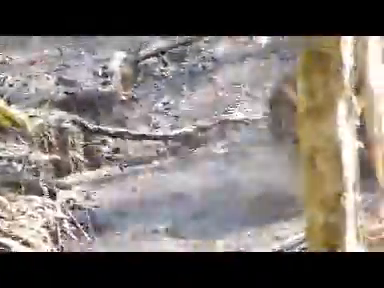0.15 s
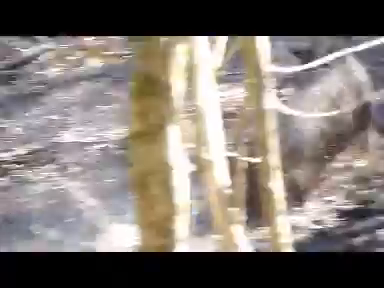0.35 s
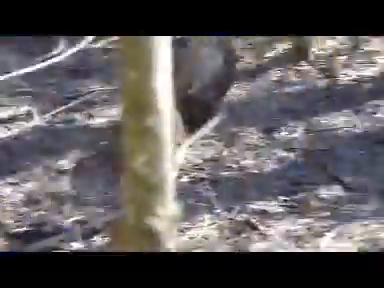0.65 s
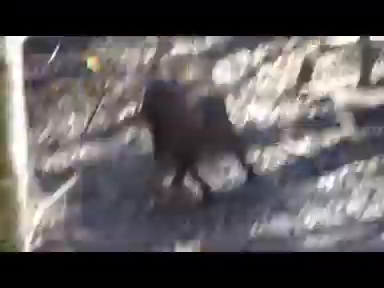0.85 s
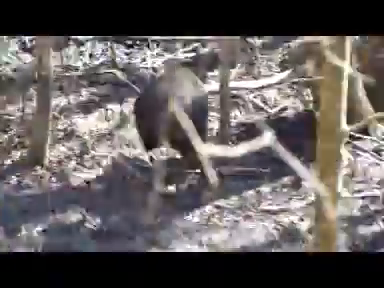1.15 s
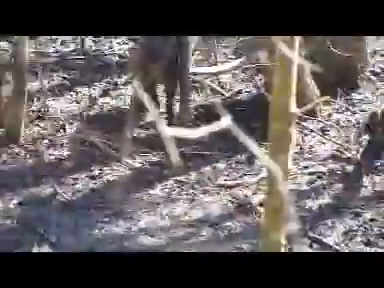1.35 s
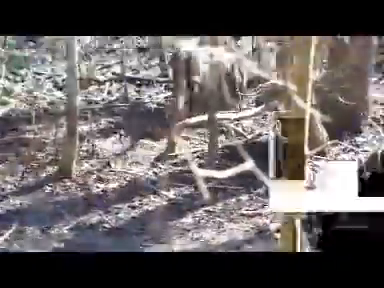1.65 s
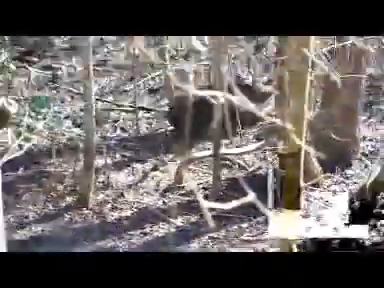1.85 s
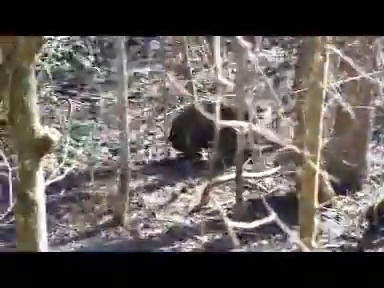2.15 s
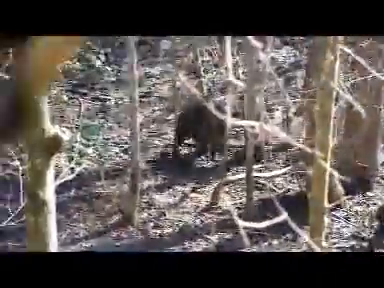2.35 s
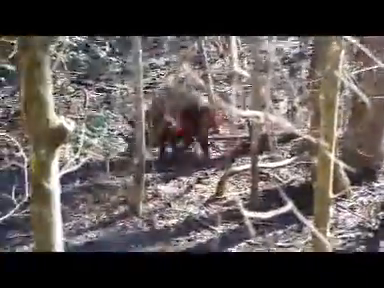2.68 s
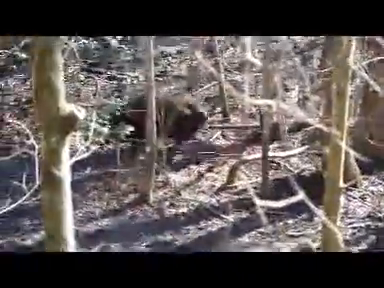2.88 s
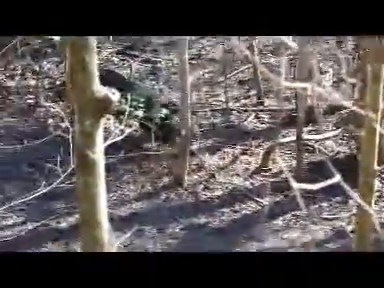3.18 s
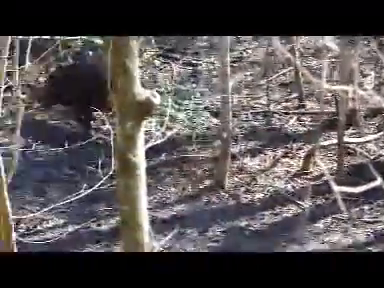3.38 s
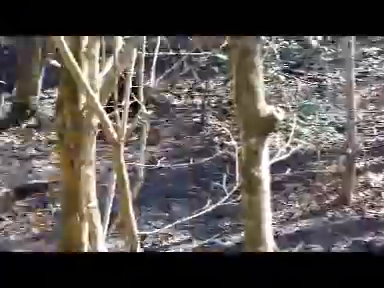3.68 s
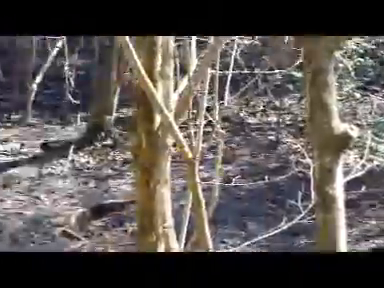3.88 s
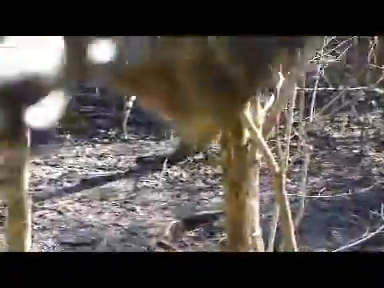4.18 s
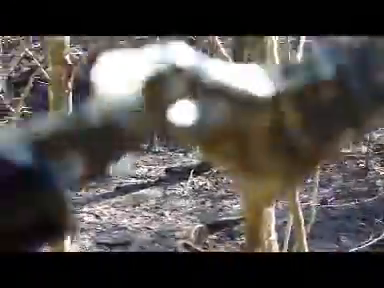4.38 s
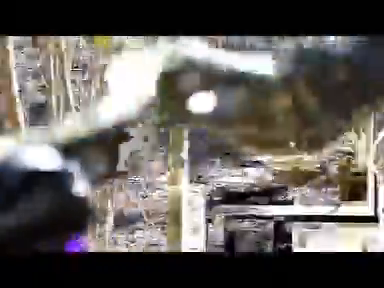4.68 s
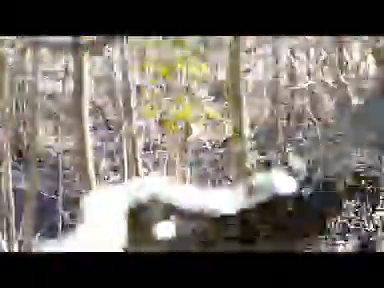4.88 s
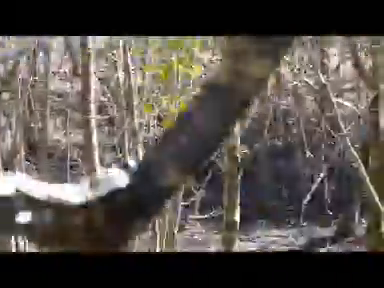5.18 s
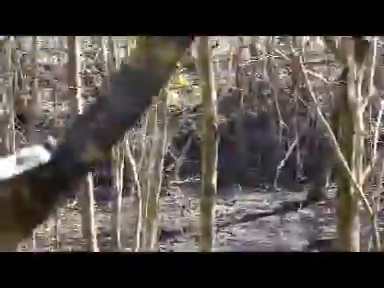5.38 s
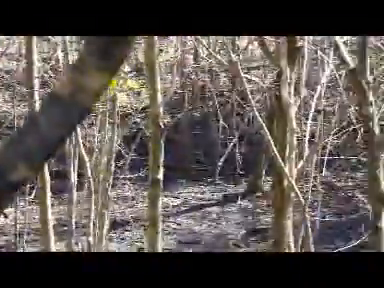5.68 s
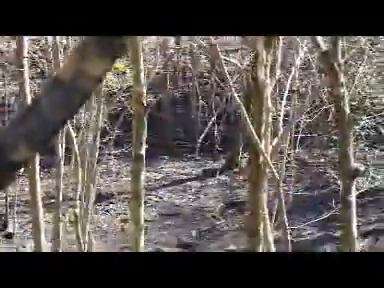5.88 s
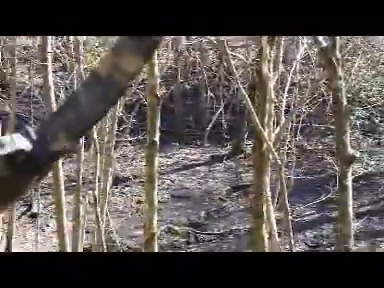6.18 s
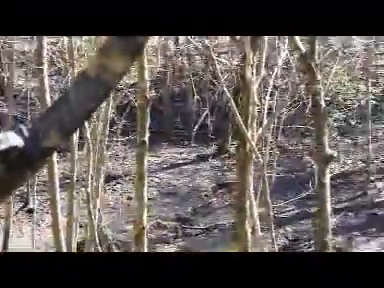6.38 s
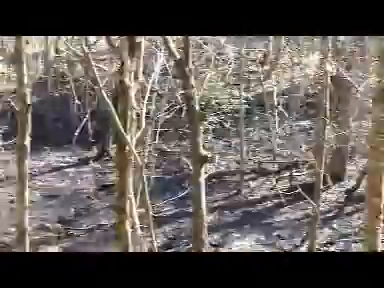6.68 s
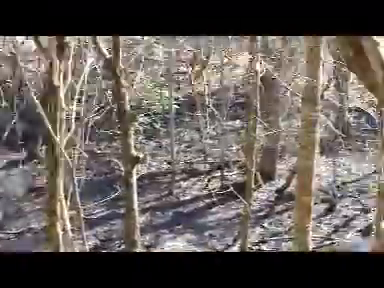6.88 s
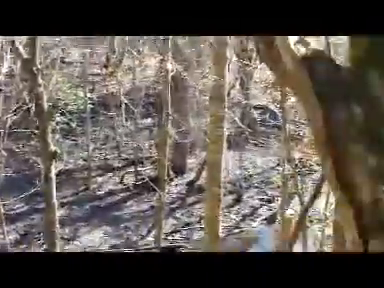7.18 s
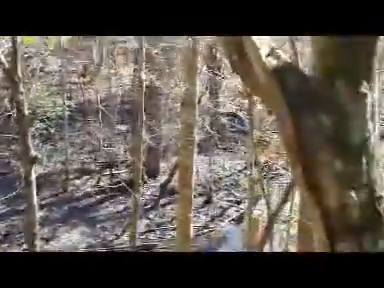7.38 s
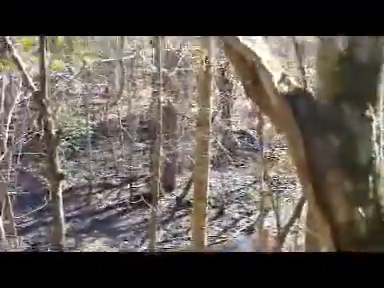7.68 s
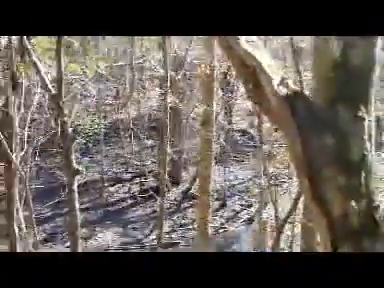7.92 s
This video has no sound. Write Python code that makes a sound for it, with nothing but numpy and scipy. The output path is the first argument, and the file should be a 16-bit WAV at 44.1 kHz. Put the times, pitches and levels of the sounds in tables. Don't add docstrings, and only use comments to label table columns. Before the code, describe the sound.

Outdoors in a dry wood, a hog cries hoarsely, grunts, falls nearly quiet, then lets out a long strained scream with cracking, gliding tones. Hooves crackle through leaf litter and break twigs while it mutters short throaty grunts. Two more clusters of torn squeals finish it. Sound is band-limited, bass-light and slightly gritty, with faint air noise and a brief diffuse woodland tail.

```python
import sys
import numpy as np
from scipy import signal
from scipy.fft import rfft, irfft, next_fast_len
from scipy.io import wavfile
from scipy.ndimage import uniform_filter1d

SR = 44100
rng = np.random.default_rng(int(sys.argv[2]) if len(sys.argv) > 2 else 0)


def dump_mix(stems):
    frames = np.atleast_2d(stems).T
    limited = np.clip(frames, -1, 1)
    pcm = np.round(limited * 32767).astype(np.int16)
    wavfile.write(sys.argv[1], SR, pcm)


def magnitude_from_level(level_db):
    exponent = np.asarray(level_db, float) / 20
    return 10 ** exponent


N = 355005

# (start [s], hold [s], chest [dB], throat over chest [dB])
GRUNTS = [(0, 0.0069, -20.5, -4), (0.059, 0.13, -31, -2), (0.299, 0.043, -32, -0.5), (0.366, 0.061, -26, 0),
          (0.568, 0.12, -31, 3), (0.694, 0.052, -27, 1), (0.862, 0.05, -37, 3), (1.009, 0.025, -49, 8),
          (1.216, 0.063, -41, 0), (1.772, 0.038, -40, -13), (2.489, 0.041, -30, -3),
          (3.038, 0.13, -31.5, 1.5), (3.404, 0.11, -35.5, 2.5), (3.559, 0.048, -36, 5),
          (3.743, 0.0066, -35, 8), (3.763, 0.008, -35, 10), (3.785, 0.018, -33, 10),
          (3.819, 0.029, -45.5, 8), (3.866, 0.052, -28, -1.5), (3.938, 0.027, -35.5, 0.5),
          (4.103, 0.046, -36, 4), (4.194, 0.046, -32, 0), (4.439, 0.082, -37, 4),
          (4.56, 0.029, -31.5, -0.5), (4.783, 0.03, -36.5, 5), (4.836, 0.021, -36, 5),
          (4.87, 0.027, -31, 8.5), (4.925, 0.022, -31.5, 3.5), (5.126, 0.086, -35, 2.5),
          (5.235, 0.024, -38, -1.5), (5.462, 0.099, -40.5, 5), (5.755, 0.046, -39, 7),
          (5.83, 0.075, -28.5, -4.5), (6.187, 0.054, -30, -4), (6.261, 0.036, -21.5, -10),
          (6.34, 0.098, -34.5, -2), (6.911, .1, -32.5, -6.5), (7.223, 0.16, -31.5, 12),
          (7.632, 0.02, -34, 2), (7.655, 0.061, -33, 8.5), (7.748, 0.15, -32, 8)]
# (start [s], hold [s], chest [dB], throat over chest [dB])
GROANS = [(1.997, .04, -34.5, -2), (2.045, 0.062, -30, -0.5), (2.106, 0.17, -35, 2.5),
          (2.588, 0.18, -38, -5.5), (2.782, .11, -31.5, -0.5), (6.645, .04, -38, 9), (6.695, 0.06, -32, 5),
          (6.799, .11, -29, -1.5), (7.002, .1, -41, 8.5), (7.413, .1, -44.5, 10.5), (7.918, .15, -34, -2)]
# (start [s], hold [s], squeal [dB], overtone over squeal [dB])
SQUEALS = [(0, 0.051, -17.5, -13), (0.051, 0.026, -24, 0), (0.078, 0.061, -24, 11.5),
           (.15, 0.043, -26, 5.5), (0.32, 0.049, -31, 11), (0.381, .03, -23, 12), (0.41, 0.037, -20, 1.5),
           (.57, 0.093, -24, 1.5), (.695, 0.048, -20, 9), (0.888, 0.061, -32, -1), (1.227, 0.037, -29, -5),
           (1.305, 0.028, -33, 11.5), (1.794, 0.071, -37.5, 7), (2.016, 0.025, -36, 1),
           (2.05, 0.032, -25, 9), (2.07, 0.098, -19.5, 6), (2.175, 0.11, -16.5, 3.5),
           (2.28, 0.054, -14, -4), (2.343, 0.019, -15, -2), (2.38, 0.073, -25.5, 6), (2.514, .01, -20, 2.5),
           (2.547, 0.17, -18, 4.5), (2.715, 0.049, -21, -2), (2.776, 0.095, -19.5, 9.5),
           (2.917, 0.18, -30, 4.5), (3.408, 0.0052, -28, 0.5), (3.786, 0.021, -27.5, -9),
           (4.188, 0.032, -30, -11), (4.461, 0.035, -28, -3), (4.874, 0.025, -21, -2),
           (6.38, 0.079, -23.5, 5), (6.651, 0.038, -33, 5.5), (6.705, 0.05, -14.5, 1),
           (6.764, 0.14, -15.5, 4), (6.902, .1, -19, 8.5), (7.003, 0.082, -21, 6), (7.092, .07, -27, 6),
           (7.241, 0.049, -26.5, 5), (7.295, 0.084, -18, 5), (7.659, 0.035, -28.5, 5.5),
           (7.812, 0.073, -29, 9.5), (7.888, 0.082, -23, 8.5), (7.998, 0.037, -21.5, 7)]
# (start [s], hold [s], lower band level [dB], tearing [0-1], lower band frequency [Hz])
TEARS = [(0.036, 0.109, -27, 0.5, 1375), (0.374, 0.082, -30, 0.44, 1438), (0.603, 0.156, -27.5, 0.37, 1397),
         (1.302, 0.0693, -57, 0.95, 1368), (2.057, .12, -29.5, 0.05, 1548), (2.189, .165, -21, 0.01, 1701),
         (2.513, 0.012, -21.5, 0.34, 1377), (2.546, 0.201, -27, 0.03, 1384), (2.768, 0.10056, -27, 1, 1402),
         (2.921, 0.16, -43, 0.37, 1369), (4.87, 0.03, -22, 0.9, 1408), (6.694, 0.0588, -29.5, 0.43, 1394),
         (6.801, 0.26, -32.5, 0.36, 1526), (7.248, .14, -27.5, 0.59, 1371),
         (7.659, 0.26, -36.5, 0.66, 1366), (7.911, 0.22, -26, 0.8, 1316)]
# (start [s], hold [s])
RATTLES = [
    (0, .2),
    (2.0, .03),
    (2.51, .05),
    (7.21, .04),
    (7.65, .17),
]
# (time [s], frequency [Hz])
JAW = [(0, 493), (.24, 358), (1.23, 334), (1.99, 450), (2.71, 437), (2.9, 357), (3.03, 263), (3.59, 377),
       (3.74, 295), (3.88, 523), (4.64, 442), (5.0, 548), (5.76, 423), (6.37, 473), (6.72, 394), (6.9, 445),
       (7.0, 479), (8.05, 404)]
# (time [s], squeal frequency [Hz], overtone frequency [Hz])
MOUTH = [(0, 1880, 2940), (.07, 1492, 3143), (.14, 1566, 3480), (.26, 1714, 3195), (.4, 1907, 3200),
         (.55, 1492, 3200), (.68, 1512, 3160), (.75, 1698, 3200), (1.0, 1468, 3132), (2.05, 1853, 3210),
         (2.14, 1850, 3296), (2.27, 1950, 3613), (2.33, 1976, 3416), (2.49, 1942, 3353), (2.52, 1950, 4211),
         (2.59, 1808, 3400), (2.76, 1619, 3400), (2.86, 2182, 3213), (3.06, 1414, 3290), (6.3, 1512, 3208),
         (6.7, 1950, 2843), (6.8, 1896, 3290), (7.0, 1982, 3242), (7.2, 2032, 3086), (7.32, 1962, 2900),
         (7.67, 2163, 2647), (7.86, 2076, 2646), (8.05, 2060, 2940)]
# (frequency [Hz], width [Hz], level [dB])
SNOUT = [(1323, 200, -7), (2094, 620, -6)]
# (frequency [Hz], width [Hz], level [dB])
RASP = [(1252, 130, -6.5), (1950, 200, 1), (2320, 960, 2.5), (2800, 210, -2.5), (3400, 870, 2.5),
        (4084, 690, 0), (4710, 500, -8)]
# (start [s], length [s], rms level [dB], from [Hz], to [Hz])
WHINES = [(0.0, .036, -25.5, 516, 420), (.41, .045, -28, 1430, 1480), (.705, .03, -27, 2250, 2150),
          (1.226, .04, -32, 1400, 1800), (2.045, .1, -33, 1030, 1080), (2.09, .074, -23, 1900, 1880),
          (2.25, .11, -19, 2050, 1930), (2.336, .034, -29, 3550, 3400), (2.345, .017, -22, 1930, 2300),
          (2.56, .039, -28, 1412, 1287), (2.6, .07, -26, 1420, 1280), (2.66, .11, -21, 1680, 1270),
          (2.688, .087, -28, 1300, 1282), (2.758, .044, -28.5, 1290, 1192), (2.892, .05, -33, 2600, 1900),
          (2.92, .08, -37, 2950, 2600), (2.999, .078, -38, 2400, 2188), (2.99, .15, -36, 228, 326),
          (3.77, .055, -34, 799, 770), (4.785, .057, -34, 820, 803), (5.765, .05, -36, 800, 820),
          (6.377, .093, -31, 1573, 1770), (6.698, .076, -32, 4780, 4900), (6.7, .17, -34, 390, 420),
          (6.73, .1, -33, 1000, 1020), (6.8, .07, -26, 3300, 3450), (6.801, .052, -26.5, 2000, 1900),
          (6.88, .08, -32.5, 408, 440), (6.9, .12, -35, 570, 540), (6.94, .11, -28, 3200, 3250),
          (7.26, .049, -25, 800, 804), (7.38, .039, -33, 940, 780), (7.85, .039, -29.5, 742, 700),
          (7.87, .08, -31, 3900, 4100), (7.885, .11, -31, 2650, 2880), (7.92, .05, -33, 3450, 3550),
          (7.99, .06, -30, 3950, 4100)]
# (time [s], peak level [dB], ringing resonance
# [Hz])
COUGHS = [(.193, -8.5, 3060), (.382, -19, 1530), (.568, -13, 860), (.925, -15.5, 1350), (1.035, -21.5, 722),
          (2.516, -6.5, 1899), (2.531, -5, 1902), (2.541, -2.5, 1950), (3.616, -14, 791), (3.746, -24, 800),
          (3.786, -9, 775), (4.474, -14, 1490), (4.562, -16.5, 600.4), (4.571, -23, 592),
          (4.837, -18.5, 788), (6.274, -15, 512), (6.282, -10.5, 603), (7.653, -24, 2103), (7.75, -12, 809),
          (7.679, -10, 2141), (0.116, -2, 2980), (2.52, -4, 1896),
          (0.003, -5, 1810), (0.014, -6, 1950), (0.023, -5, 1744), (0.033, -11, 1730), (0.102, -5, 3310),
         (0.139, -4.5, 3760), (0.169, -13, 1610), (0.593, -10.5, 1400), (2.534, -6, 1525),
         (2.659, -14, 1851), (3.406, -16.5, 1503), (3.763, -12.5, 784), (3.799, -16, 800),
         (3.886, -16, 2440), (3.901, -20, 527), (3.914, -20, 704), (4.621, -18.5, 3413), (4.728, -20, 3200),
         (4.887, -9, 1450), (4.927, -17, 645), (4.942, -15, 600), (7.295, -6, 1960), (7.381, -8.5, 761.5),
         (7.668, -6.5, 2088), (7.698, -9, 2167), (7.764, -15, 825.4), (7.8, -10, 770.6),
         (5.857, -15.5, 482), (5.864, -14, 510), (5.869, -13, 505), (5.882, -15, 449), (2.603, -7, 1794),
         (2.618, -6, 1750), (2.664, -7, 1808), (6.716, -7, 1950), (6.737, -2.5, 1950), (3.787, -18, 1507),
         (4.196, -18, 1746), (7.24, -11, 798)]
# (time [s], rustle level [dB])
LITTER = [(0, -43), (.24, -55), (.55, -51), (.76, -50.5), (1.99, -52), (2.08, -34.5), (2.45, -42.5),
          (2.65, -43), (2.82, -40), (3.3, -62.5), (3.6, -60), (3.75, -47.5), (4.87, -51), (5.7, -51.5),
          (6.35, -39), (6.6, -47), (6.86, -43), (8.05, -55)]
# (start [s], hold [s], rustle level [dB])
STEPS = [(.35, 0.085, -49), (.975, 0.03, -43.5), (1.31, 0.019, -43), (1.78, 0.08, -47), (1.17, 0.037, -50),
         (1.61, 0.11, -59), (1.897, 0.0062, -35.5), (2.442, .004, -41), (3.637, 0.016, -40),
         (3.864, 0.046, -33), (4.237, .004, -41.5), (4.92, 0.0036, -53), (5.724, 0.015, -46),
         (5.813, 0.015, -40), (5.93, .1, -45), (7.16, .1, -44), (7.79, 0.0051, -43.5), (7.9, 0.13, -45.5)]
# (frequency [Hz], density [dB per Hz])
LEAF_SPECTRUM = [(35, -58.5), (60, -43), (214, -12.5), (493, -6), (732, -3.5), (847, -15), (1260, -7),
                 (1460, -2.5), (4050, -1), (8750, -17.5), (11400, -47.5), (19200, -120)]
# (time [s], peak level [dB], ring frequency [Hz])
SNAPS = [(0.119, -21, 3400), (0.3466, -7, 3000), (0.38, -15, 3340), (0.9257, -13, 3363), (0.987, -24, 2750),
         (1.3102, -16, 3310), (1.3486, -10.5, 4227), (1.0529, -25.5, 6330), (1.328, -15.5, 2450),
         (1.856, -22.5, 3206), (1.8964, -12, 2196), (1.921, -4.5, 5550), (2.4423, -11, 2020),
         (2.444, -10.5, 5260), (4.185, -19, 5044), (4.2097, -13, 2068), (4.238, -25, 7460),
         (4.921, -19, 5770), (5.1318, -19, 4450), (5.1761, -20.5, 4200), (5.482, -20.5, 3974),
         (5.735, -23, 7450), (5.815, -18, 6820), (5.935, -15, 4996), (5.9167, -17.5, 1888),
         (6.0115, -18, 3480), (5.7593, -19, 2510), (4.3413, -20, 3110), (4.4731, -21, 3200),
         (5.1594, -17, 2800), (4.5826, -17, 2134), (5.742, -26, 3990), (6.1925, -20, 4820),
         (3.4095, -22, 1544), (3.6352, -20, 7640), (3.798, -12, 1830), (3.8393, -28, 2355),
         (3.8639, -9, 3393), (3.9682, -10, 3400), (4.0826, -13, 2883), (4.2384, -18.5, 2885),
         (4.355, -13, 3234), (4.4028, -10, 2800), (4.446, -11.5, 2530), (4.8747, -10, 1490),
         (4.922, -18, 7430), (0.357, -14.5, 4450), (5.5152, -12, 2500), (5.7217, -15, 3980),
         (5.813, -16, 2736), (6.6919, -10, 1911), (7.752, -13, 2157), (7.792, -5.5, 2063)]
# (frequency [Hz], t60 [s])
WOODS_DECAY = [(200, 0.016), (1500, 0.5), (8000, 0.4)]
# (frequency [Hz], density [dB per Hz])
AIR_SPECTRUM = [(18, -79.5), (30, -22), (140, -5), (390, -5.5), (1080, 1.5), (1340, -4.5), (4090, 0),
                (6130, -28), (6740, -8), (8750, -24.5), (11400, -54.5), (19200, -120)]

THROAT_HZ, TIGHT_HZ = 839, 1000
HUM_WIDTH_HZ = 90
RATTLE_HZ, BLUR_HZ, SPEED_UP_S = 85, 400, 0.07
GRUNT_RISE_S, GRUNT_FALL_DB_S = 0.005, 260
SQUEAL_RISE_S, SQUEAL_FALL_DB_S = 0.009, 280
STEP_RISE_S, STEP_FALL_DB_S = 0.0047, 319
GRUNT_TAIL_DB, CRY_TAIL_DB = -15, -14
TAIL_DB_S, SWELL_S = 45, 0.04
LEAK_DB, LEAK_OVER_DB = -7, -2.5
SHIVER_DB, SHIVER_HZ = 1.5, 40
TONGUE_DRIFT, TONGUE_HZ = 0.03, 12
TORN_LOSS_DB, TORN_RASP_DB = -9, 5
WAVER, WAVER_S, BREAK_DB = 0.016, 0.005, 3


def hog():
    chest_db, throat_db, squeal_db, over_db, tight = breath()
    effort = np.clip((squeal_db + 32.5) / 12, 0, 1)
    split_db, torn, split_hz = tearing()
    fast = folds(pace(effort), jitter=0.35, uneven_db=2.5, rough=0.45)
    jerk = 1 + 0.015 * wander(20)

    chest, throat = grunt_tract(effort, tight)
    hum = resonate(fast, curves(JAW)[0] * jerk, HUM_WIDTH_HZ, -1.6)
    chest = (1 - tight) * chest + tight * hum

    squeal, overtone = squeal_tract(fast, effort, jerk)
    pitched = magnitude_from_level(squeal_db - 1.5) * squeal - magnitude_from_level(over_db - 4.5) * overtone
    rasp = magnitude_from_level(-6 + 0.4 * squeal_db + 0.6 * over_db) * rasp_tract(fast, jerk)
    cry = magnitude_from_level(TORN_LOSS_DB * torn) * pitched + magnitude_from_level(TORN_RASP_DB * torn) * rasp
    split = resonate(fast, split_hz * jerk, 260, -25) + 0.6 * whistle(split_hz * jerk)
    return magnitude_from_level(chest_db) * chest - magnitude_from_level(throat_db) * throat + cry - magnitude_from_level(split_db) * split


def grunt_tract(effort, tight):
    slow = folds(72.0, jitter=0.5, uneven_db=3.5, rough=0.55)
    belly = magnitude_from_level(-6 + 4 * wander(4)) * (1 - effort) * resonate(slow, 270, 190, -5.5)
    chest = resonate(slow, curves(JAW)[0], 170, -3.5) + belly
    stride = np.roll(np.sin(2 * np.pi * 2.8 * np.arange(N) / SR), SR)
    throat_hz = (THROAT_HZ + (TIGHT_HZ - THROAT_HZ) * tight) * (1 + 0.03 * stride)
    throat = resonate(slow, throat_hz, 180, -31)
    for hz, width, db in SNOUT:
        throat = throat + magnitude_from_level(db) * resonate(slow, hz, width, -36.5)
    return chest, throat


def squeal_tract(fast, effort, jerk):
    squeal_hz, over_hz = curves(MOUTH)
    squeal = resonate(fast, squeal_hz * jerk, 340, -25) + 0.6 * effort * whistle(squeal_hz)
    overtone = resonate(fast, over_hz * jerk, 380, -25) + 0.6 * effort * whistle(over_hz)
    sum_tone = resonate(fast, squeal_hz + over_hz, 390, -32)
    second_partial = resonate(fast, 2 * over_hz, 700, -25.5)
    overtone = overtone + effort * (magnitude_from_level(-18) * sum_tone + magnitude_from_level(-35) * second_partial)
    return squeal, overtone


def rasp_tract(fast, jerk):
    rasp = np.zeros(N)
    for k, (hz, width, db) in enumerate(RASP):
        moving_hz = hz * (jerk + TONGUE_DRIFT * wander(TONGUE_HZ))
        rasp += (-1) ** k * magnitude_from_level(db + 2.5 * wander(18)) * resonate(fast, moving_hz, width, -13)
    return evened(rasp)


def breath():
    low_rows, high_rows = np.array(GRUNTS + GROANS), np.array(SQUEALS)
    low = pushes(low_rows, GRUNT_RISE_S, GRUNT_FALL_DB_S, GRUNT_TAIL_DB)
    high = pushes(high_rows, SQUEAL_RISE_S, SQUEAL_FALL_DB_S, CRY_TAIL_DB)
    throat = low * magnitude_from_level(low_rows[:, 3:]) ** 2
    over = high * magnitude_from_level(high_rows[:, 3:]) ** 2
    tight = magnitude_from_level(total_db(throat[len(GRUNTS):]) - total_db(throat)) ** 2
    squeal = np.vstack([high, magnitude_from_level(LEAK_DB) ** 2 * (low + throat)])
    over = np.vstack([over, magnitude_from_level(LEAK_OVER_DB) ** 2 * low])
    levels = [total_db(p) + SHIVER_DB * wander(SHIVER_HZ) for p in (low, throat, squeal, over)]
    return *levels, tight


def tearing():
    power = pushes(TEARS, SQUEAL_RISE_S, SQUEAL_FALL_DB_S)
    start, hold, _, degree, hz = np.transpose(TEARS)
    share = power / power.max(1, keepdims=True) * degree[:, None] ** 2
    edges = np.ravel([start, start + hold], "F")
    split_hz = np.interp(np.arange(N) / SR, edges, np.repeat(hz, 2))
    return total_db(power), np.clip(magnitude_from_level(total_db(share)), 0, 1), split_hz


def pace(effort):
    t = np.arange(N) / SR
    free = np.ones(N)
    for s, hold in RATTLES:
        speeding = np.clip((t - s - hold) / SPEED_UP_S, 0, 1)
        free = np.minimum(free, np.where(t < s, 1, speeding))
    return RATTLE_HZ + (BLUR_HZ - RATTLE_HZ) * free * uniform_filter1d(effort, size=3000)


def folds(rate, jitter, uneven_db, rough):
    turns = np.cumsum(rate * np.exp(jitter * wander(90))) / SR
    closures = np.diff(np.floor(turns), prepend=0)
    slaps = closures * magnitude_from_level(uneven_db * rng.standard_normal(N)) / np.sqrt(rate)
    puffs = (0.66 + np.exp(-(turns % 1) / 0.83)) * rng.standard_normal(N)
    return (1 - rough) * evened(slaps) + rough * evened(puffs)


def resonate(x, hz, width, skirt_db):
    turn = np.exp(2j * np.pi * np.cumsum(hz * np.ones(len(x))) / SR)
    r = np.exp(-np.pi * width / SR)
    once = signal.lfilter([1 - r], [1, -r], x * turn.conj() + 1e-18)
    twice = signal.lfilter([1 - r], [1, -r], once)
    return evened((turn * (twice + magnitude_from_level(skirt_db) * once)).real)


def whistle(hz):
    turns = np.cumsum(hz * (1 + 0.05 * wander(80))) / SR
    return evened(magnitude_from_level(0.91 * wander(60)) * np.sin(2 * np.pi * turns))


def whines():
    out = np.zeros(N + SR)
    for s, length, db, from_hz, to_hz in WHINES:
        u = np.linspace(0, 1, round(length * SR))
        shake = uniform_filter1d(rng.standard_normal(SR // 4), round(WAVER_S * SR))
        shake = evened(shake)[:len(u)]
        hz = (from_hz + (to_hz - from_hz) * u) * (1 + WAVER * shake)
        level = magnitude_from_level(db + 6.5 + BREAK_DB * np.clip(shake[::-1], -3, 1)) * np.sqrt(np.sin(np.pi * u))
        out[round(s * SR):][:len(u)] += level * np.sin(2 * np.pi * np.cumsum(hz) / SR)
    return out[:N]


def coughs():
    out, t = np.zeros(N + 2000), np.arange(2000) / SR
    for s, db, hz in COUGHS:
        puff = uniform_filter1d(rng.standard_normal(2000), size=7)
        ring_s = 0.005 * (800 / hz) ** 0.5
        envelope = np.exp(-t / ring_s) * np.minimum(t / 0.001, 1)
        out[round(s * SR):][:2000] += magnitude_from_level(db) * (np.sin(2 * np.pi * hz * t) + 0.2 * puff) * envelope
    return out[:N]


def twigs():
    out, t = np.zeros(N + 2000), np.arange(2000) / SR
    for s, db, hz in SNAPS:
        crack = rng.standard_normal(2000)
        ring = np.sin(2 * np.pi * hz * t) + 0.35 * np.sin(2 * np.pi * hz * 0.58 * t)
        ring = ring * np.exp(-t / 0.001)
        splinters = 3 * uniform_filter1d(crack, size=13) * np.cos(2 * np.pi * hz * t)
        splinters = splinters * (0.3 * np.exp(-t / 0.0015) + 0.1 * np.exp(-t / 0.005))
        snap = 0.9 * ring + splinters + 0.05 * crack * np.exp(-t / 0.003)
        out[round(s * SR):][:2000] += magnitude_from_level(db + 1.6) * snap
    return out[:N]


def leaves():
    size = magnitude_from_level(3.2 * np.minimum(rng.exponential(1, N), 3)) * rng.standard_normal(N)
    crackle = size * (rng.random(N) < 1500 * np.exp(0.8 * wander(30)) / SR)
    rustle = colour(evened(crackle) + 0.98 * rng.standard_normal(N), LEAF_SPECTRUM)
    hooves_db = total_db(pushes(STEPS, STEP_RISE_S, STEP_FALL_DB_S))
    stir = np.hypot(magnitude_from_level(curves(LITTER)[0]), magnitude_from_level(hooves_db))
    return magnitude_from_level(13) * stir * rustle


def woods(x):
    taps = np.zeros(SR // 2)
    at = np.arange(400, len(taps) - 20, 20)
    taps[at + rng.integers(0, 20, len(at))] = rng.choice([-1.0, 1.0], len(at))
    hz, t, z = signal.stft(taps, SR, nperseg=256)
    decay_hz, decay_s = np.transpose(WOODS_DECAY)
    t60 = np.interp(np.log(hz + 1), np.log(decay_hz), decay_s)[:, None]
    tail = signal.istft(z * magnitude_from_level(-60 * t / t60), SR, nperseg=256)[1]
    return signal.fftconvolve(x, tail / np.linalg.norm(tail))[:N]


def air():
    wind = magnitude_from_level(-51.5 + 6.1 * wander(6.3)) * resonate(rng.standard_normal(N), 46, 62, -2.5)
    return magnitude_from_level(-46 + 3 * wander(5)) * colour(rng.standard_normal(N), AIR_SPECTRUM) + wind


def pushes(rows, rise_s, fall_db_s, tail_db=-60):
    start, hold, db = np.transpose(rows)[:3, :, None]
    age = np.arange(0, N / SR + 0.002, 0.001) - start
    after = np.maximum(age - hold, 0)
    main = np.clip(age / rise_s + 1, 0, 1) * magnitude_from_level(db - fall_db_s * after)
    soft = np.clip(age / SWELL_S + 1, 0, 1) * magnitude_from_level(db + tail_db - TAIL_DB_S * after)
    return main ** 2 + soft ** 2


def total_db(power):
    level = 10 * np.log10(power.sum(0) + 1e-9)
    return np.interp(np.arange(N) / SR, np.arange(power.shape[1]) / 1000, level)


def curves(rows):
    s, *columns = np.transpose(rows)
    return [np.interp(np.arange(N) / SR, s, c) for c in columns]


def colour(x, points):
    hz, db = np.transpose(points)
    size = next_fast_len(N)
    log_hz = np.log(np.fft.rfftfreq(size, 1 / SR) + 1)
    gain = magnitude_from_level(np.interp(log_hz, np.log(hz + 1), db))
    return evened(irfft(rfft(x, size) * gain, size)[:N])


def wander(hz):
    size = max(int(SR / hz / 16), 1)
    slow = uniform_filter1d(uniform_filter1d(rng.standard_normal(N // 16 + 2), size), size)
    return np.interp(np.arange(N) / 16, np.arange(len(slow)), evened(slow))


def evened(x):
    return x / np.sqrt(np.mean(x ** 2) + 1e-20)


def scene():
    near = magnitude_from_level(-2) * hog() + whines() + coughs() + twigs()
    return (near + magnitude_from_level(-8) * woods(near) + leaves() + air())[None]


def band_dropouts(x):
    hz, t, z = signal.stft(x, SR, nperseg=2048, noverlap=1536)
    power = uniform_filter1d(uniform_filter1d(abs(z) ** 2, size=5, axis=0), size=3, axis=1)
    band_db = 10 * np.log10(power + 1e-14)
    luck = np.kron(rng.standard_normal((150, len(t) // 5 + 1)), np.ones((7, 5)))[:len(hz), :len(t)]
    depth_db = 36 + 5 * luck - 5 * (hz[:, None] < 130)
    kept = band_db.max(0) - band_db < depth_db
    return signal.istft(z * np.where(kept, 1, 0.004), SR, nperseg=2048, noverlap=1536)[1][:N]


def top_cut(x):
    return signal.sosfilt(signal.butter(12, 8900, fs=SR, output="sos"), x)


def record(dry):
    limited = 1.2 * np.tanh(dry[0] / 1.2)
    bass_cut = signal.butter(N=3, Wn=130, btype="high", fs=SR, output="sos")
    thin = signal.sosfilt(bass_cut, limited)
    band_limit = signal.firwin(1023, 8780, window=("kaiser", 9), fs=SR)
    mix = signal.oaconvolve(band_dropouts(thin), band_limit, "same")
    return top_cut(mix[None])


dry = scene()
out = record(dry)
dump_mix(out)
```